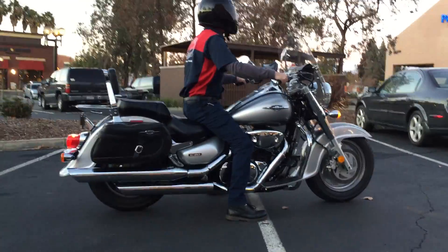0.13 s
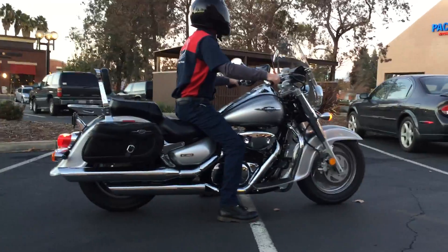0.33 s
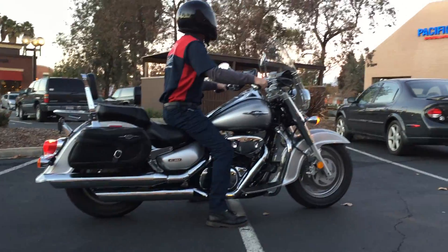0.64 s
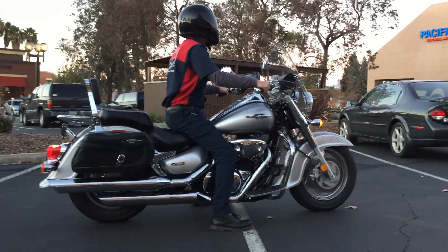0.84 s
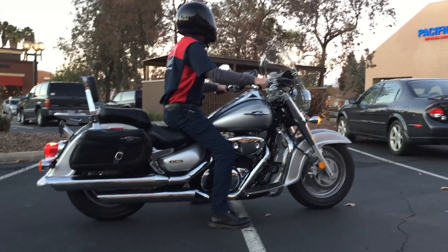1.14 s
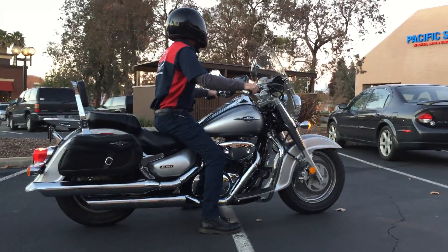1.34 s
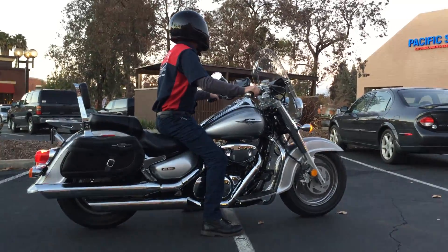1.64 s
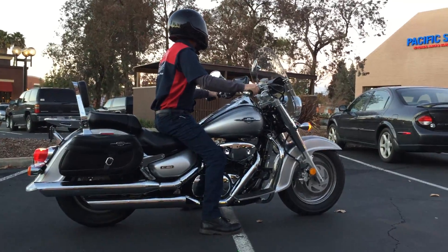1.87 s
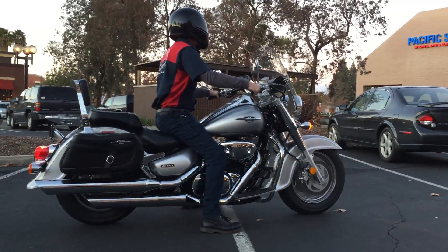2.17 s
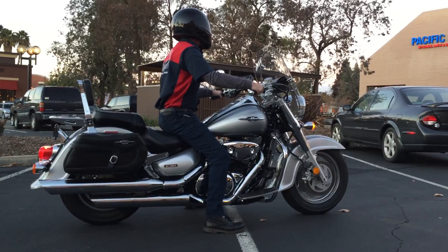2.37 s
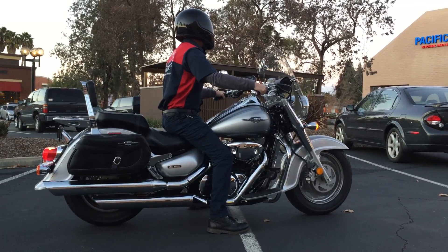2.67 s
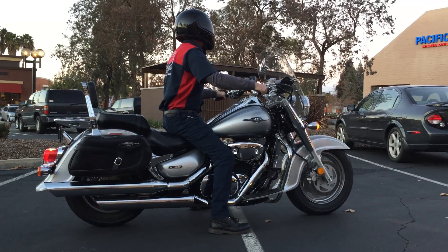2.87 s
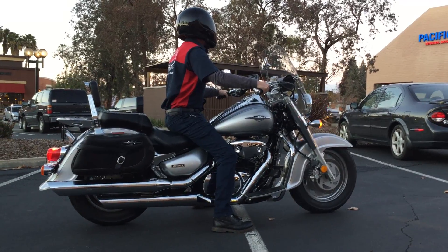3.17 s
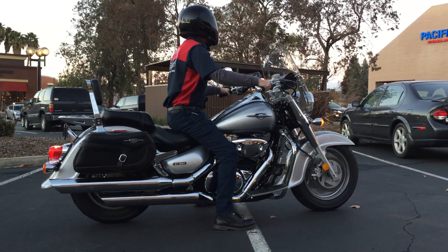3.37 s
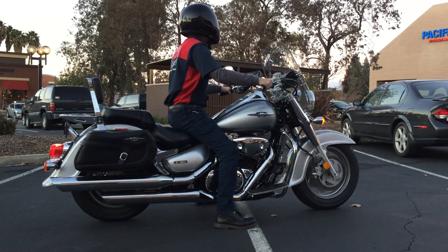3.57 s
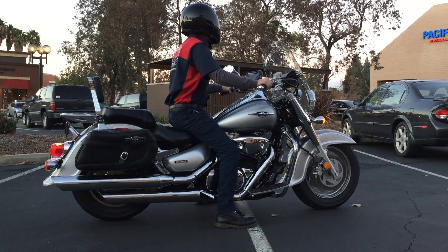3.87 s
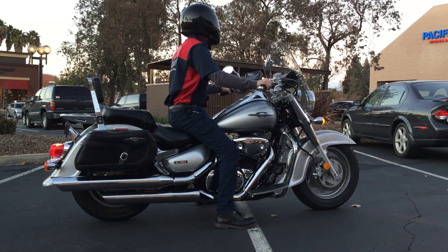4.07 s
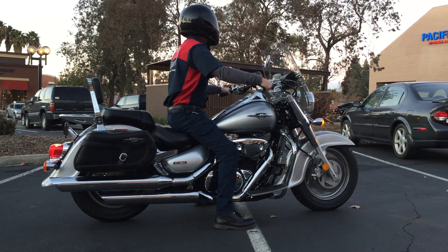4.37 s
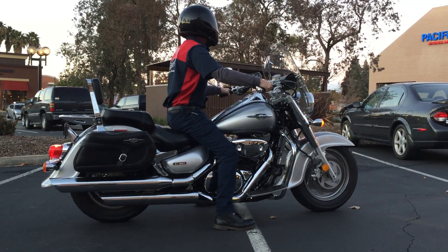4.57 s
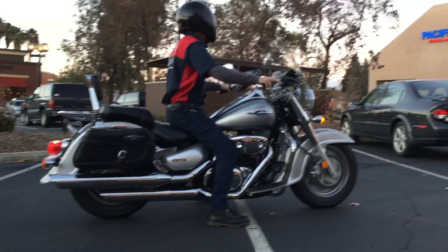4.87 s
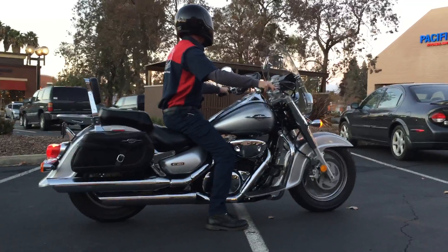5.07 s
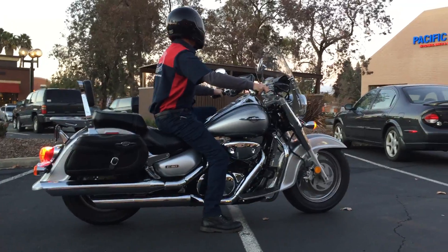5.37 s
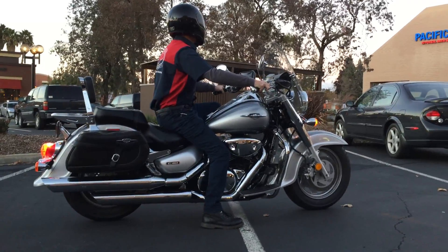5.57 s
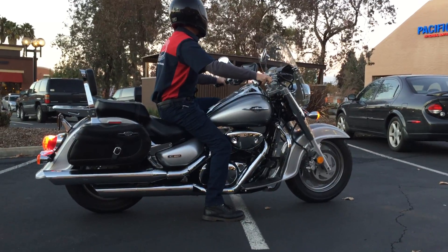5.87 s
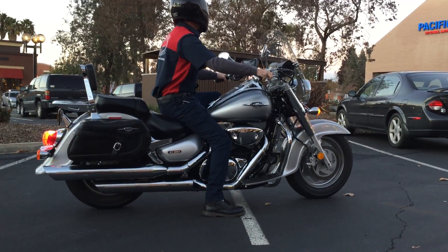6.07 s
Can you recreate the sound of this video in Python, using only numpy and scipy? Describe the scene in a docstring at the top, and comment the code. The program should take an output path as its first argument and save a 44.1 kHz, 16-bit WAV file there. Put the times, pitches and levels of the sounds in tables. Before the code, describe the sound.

Steady, bass-heavy motorcycle idle, the two cylinders firing in an unevenly spaced, galloping beat with mechanical chatter on top. Two short revs surge up, growling and rasping, then coast down through a humming pipe drone, uneven firings and small bright ticks. The second rev is slightly higher and starts with a couple of knocks. Mono, fairly close outdoor pickup, faint reflections from nearby walls and cars.

```python
"""In a parking lot, a few metres from the microphone, a big V-twin motorcycle idles fast and is blipped twice.
Two unevenly spaced exhaust pulses a cycle ring the pipes; with the throttle open they bark, rasp and hiss,
and a growl of cycle-rate tones climbs with the speed. Coasting down, the pipes drone in falling tones.
Valve strokes ring the cases as clatter; just above idle the firings turn uneven, and sharp ticks sound.
Parked cars and shop fronts return a thin tail."""
import sys
import numpy as np
from scipy import signal
from scipy.fft import rfft, irfft, next_fast_len
from scipy.io import wavfile
from scipy.ndimage import uniform_filter1d

SR = 44100
rng = np.random.default_rng(int(sys.argv[2]) if len(sys.argv) > 2 else 0)


def digitize_waveform(pressure):
    """Quantize a signal to 16-bit integers and store it at the path in sys.argv[1].

    Rows of a 2-D input are taken as channels; values are limited to [-1, 1].
    """
    field = np.atleast_2d(pressure).T
    bounded = np.clip(field, -1, 1)
    quanta = np.round(bounded * 32767).astype(np.int16)
    wavfile.write(sys.argv[1], SR, quanta)


N = 273861
TIME = np.arange(N) / SR
SIZE = next_fast_len(N + SR)  # room for tails to ring out
FREQ = np.arange(SIZE // 2 + 1) * SR / SIZE + 1e-6  # Hz, kept above zero


def undb(db):
    """Decibels to gain."""
    return 10 ** (np.asarray(db) / 20)


def shape(x, response):
    """Pass a sound through a frequency response."""
    return irfft(rfft(x, SIZE) * response, SIZE)[:N]


def mode(hz, width):
    """Response of one resonance, gain 1 at its centre."""
    return 1j * FREQ * width / (hz ** 2 - FREQ ** 2 + 1j * FREQ * width)


def modes(table):
    """Sum of the resonances in a table of (frequency, width, level)."""
    return sum(undb(db) * mode(hz, width) for hz, width, db in table)


def colour(points):
    """Response through (frequency, level) points, joined on a log frequency scale."""
    hz, db = np.transpose(points)
    return undb(np.interp(np.log(FREQ), np.log(hz), db))


def low_cut(hz):
    """First-order high-pass: an open pipe end radiates little bass."""
    return 1j * FREQ / (1j * FREQ + hz)


def high_cut(hz):
    """Second-order low-pass: a valve takes time to open, so its pulse is round."""
    s = 1j * FREQ / hz
    return 1 / (1 + np.sqrt(2) * s + s ** 2)


def steady(x):
    """Hold the rms near 1 over a few cycles, keeping the beat within them."""
    size = SR // 7
    power = uniform_filter1d(uniform_filter1d(x ** 2, size), size // 2)
    return x / np.sqrt(power + 1e-12)


def clicks(times, sizes):
    """A click of the given size at each time."""
    places = np.clip(times * SR, 0, N - 1).astype(int)
    return np.bincount(places, sizes, N)


def bursts(hits, rise_s, fall_s):
    """Envelope that swells and dies after each click."""
    s = 2j * np.pi * FREQ
    return np.abs(shape(hits, 1 / ((1 + s * rise_s) * (1 + s * fall_s))))


def grit(spread_db):
    """Noise made of tiny impacts, its level redrawn every 32 samples."""
    grain_db = spread_db * np.repeat(rng.standard_normal(N // 32 + 1), 32)[:N]
    return rng.standard_normal(N) * undb(grain_db)


def moments(crank, place):
    """Times at which the engine passes a place in its cycle."""
    cycles = np.arange(int(crank[-1] - place) + 1) + place
    return np.interp(cycles, crank, TIME)


def parking_lot(x, wet_db=-15, t60_s=1.0):
    """Parked cars and shop fronts scatter a thin tail."""
    tail = rng.standard_normal(N) * undb(-60 * TIME / t60_s) * (TIME > .015)
    tail = tail / np.linalg.norm(tail)
    return x + undb(wet_db) * shape(x, rfft(tail, SIZE) * low_cut(hz=305))


# Sharp ticks: (time [s], peak level before the trim and the colouring [dB])
TICK_TIMES = [(2.4718, -27), (2.5244, -28.5), (2.602, -27), (2.6823, -34), (2.804, -37), (4.867, -31),
              (4.916, -29), (5.0219, -31.5), (5.074, -34), (5.1877, -32.5)]
# Colour of the escaping gas, which also tints the ticks: (frequency [Hz], level [dB])
GAS_COLOUR = [(600, -3), (1200, 1), (2400, 3), (3200, -2), (4300, 6.5), (5200, 0.5), (7000, 1), (9600, -2),
              (10400, -9.5), (11800, -4), (13500, -9.5), (15500, -6.5)]


def ticks(trim_db=-4, fall_s=0.013):
    """Bright metallic ticks while the engine slows: short bursts of gritty noise."""
    s, db = np.transpose(TICK_TIMES)
    # a click through the burst filter shrinks with fall time, so scale it back up
    envelope = bursts(clicks(s, undb(db + trim_db)), rise_s=.0005, fall_s=fall_s) * fall_s * SR
    return shape(envelope * grit(spread_db=6.5), colour(GAS_COLOUR) * low_cut(hz=2500) * high_cut(hz=8700))


# Valve gear strokes: (place in the cycle [0-1], level [dB])
VALVE_STROKES = [(.2, -17), (.42, 2), (.55, 2.5), (0.838, 8), (0.962, 3.5)]
# Knocks in the cases as the drive takes up: (time [s], level over the levelled strokes [dB])
DRIVE_KNOCKS = [(3.968, 15), (4.028, 11)]
# Broad body of the engine: (frequency [Hz], level [dB])
ENGINE_BODY = [(250, 10), (600, 0.5), (1100, -3), (1700, 3.5), (2100, -5.5), (2600, -18), (3300, -2),
               (3900, -6), (5000, -19.5), (6500, -14.5), (8500, -26.5), (15000, -59)]
# Modes of the cases and cooling fins: (frequency [Hz], width [Hz], relative level [dB])
CASE_MODES = [(1394, 28, -7), (1567, 25, -3.5), (1689, 24, -5), (1786.5, 21, -1), (1877, 25, 3),
              (2070, 51, -17.5), (2770, 13, -13), (3102, 80, -13), (3565, 43, -9), (3893, 76, -11.5),
              (5990, 5.6, -14)]


def valve_gear(crank, clatter_db, rattle_db=-1, ring_db=-3, chain=4.0, scatter_db=4.0, fall_s=0.0097):
    """Rockers and valves strike at fixed places and ring the cases; chains and gears rattle between."""
    strokes = 0
    for place, db in VALVE_STROKES:
        times = moments(crank, place)
        strokes = strokes + clicks(times, undb(db + scatter_db * rng.standard_normal(len(times))))
    s, db = np.transpose(DRIVE_KNOCKS)
    knocks = bursts(clicks(s, undb(db)), rise_s=0.00031, fall_s=fall_s) * fall_s * SR
    blows = steady(bursts(strokes, rise_s=0.00033, fall_s=fall_s)) + knocks
    rattle = steady(shape((chain + blows) * grit(spread_db=-0.5), colour(ENGINE_BODY) * low_cut(hz=147)))
    ring = steady(shape((1.0 + blows) * rng.standard_normal(N), modes(CASE_MODES) * low_cut(hz=890)))
    return rattle * undb(clatter_db + rattle_db) + ring * undb(clatter_db + ring_db)


RADIATES_HZ = 54  # the pipe ends radiate little below this


def tones(cycle, rate_hz, table):
    """Clean multiples of the cycle rate, at rms 1; the deepest hardly leave the pipe."""
    out = 0
    for multiple, db in table:
        radiated = 1 / (1 + (RADIATES_HZ / (multiple * rate_hz)) ** 6)
        out = out + undb(db) * radiated * np.sin(2 * np.pi * multiple * cycle)
    return steady(out)


# Tones of the shut-throttle drone: (multiple of the cycle rate, relative level [dB])
DRONE_TONES = [(3, 0), (4, -10.5), (5, -5.5), (6, -8), (8, -12.5), (9, -17.5)]


def drone(crank, rate_hz, coasting, drone_db, lag_cycles=0.288):
    """Coasting with the throttle shut, the engine pumps the pipes in a smooth falling tone."""
    return tones(crank - lag_cycles, rate_hz, DRONE_TONES) * coasting * undb(drone_db)


# Tones of the open-throttle growl: (multiple of the cycle rate, relative level [dB])
GROWL_TONES = [(2, 6), (5, 3), (6, -3), (7, -8.5), (8, -7.5), (11, -16)]


def growl(port, rate_hz, throttle, growl_db):
    """Under load the pressure waves run together into a tone that climbs with the engine."""
    return tones(port, rate_hz, GROWL_TONES) * throttle ** 0.72 * undb(growl_db)


# Upper modes of the mufflers: (frequency [Hz], width [Hz], relative level [dB])
MUFFLER_MODES = [(394, 38, 13.5), (466, 57, 5.5), (512, 91, 9.5), (720, 35, 4.5), (932, 30, 10),
                 (1090, 400, -6.5)]


def gas(pulses, rasp_db, crack_db, hiss_db, flow=0.2):
    """Each pulse cracks and pushes a turbulent puff through the mufflers, over a steady flow."""
    puffs = steady(bursts(pulses, rise_s=0.0028, fall_s=0.012))
    muffler = modes(MUFFLER_MODES) * low_cut(hz=269) ** 2
    rasp = steady(shape(puffs * grit(spread_db=-3.5), muffler))
    crack = steady(shape(pulses, muffler * low_cut(hz=398) * high_cut(hz=1140)))
    hiss = steady(shape((flow + puffs) * grit(spread_db=0.0), colour(GAS_COLOUR) * low_cut(hz=450) ** 2))
    return rasp * undb(rasp_db) + crack * undb(crack_db) + hiss * undb(hiss_db)


# Low modes of the exhaust: (frequency [Hz], width [Hz], relative level [dB], polarity [+1 or -1])
PIPE_MODES = [(65.9, 12.1, 2, 1), (98.9, 12.4, -2, -1), (114.4, 5.5, -8, 1), (152.4, 24, -7.5, -1),
              (174.8, 17, -15, 1), (207, 25, -22, -1), (266.8, 15.3, -16.5, 1)]
# Modes that hot, fast gas drives: (frequency [Hz], width [Hz], relative level [dB])
BARK_MODES = [(171.7, 38, 26.5), (210, 91, -14), (270, 26, 3)]


def exhaust(pulses, boom_db, bark_db):
    """The pulses ring the pipes: low modes boom, and higher, broader modes bark."""
    pipe = sum(sign * undb(db) * mode(hz, width) for hz, width, db, sign in PIPE_MODES)
    pipe = pipe * low_cut(hz=46.5) * low_cut(hz=27) * high_cut(hz=606)
    bark = modes(BARK_MODES) * low_cut(hz=84.4) ** 2 * high_cut(hz=318) ** 2
    return steady(shape(pulses, pipe)) * undb(boom_db) + steady(shape(pulses, bark)) * undb(bark_db)


# Where the two cylinders fire: one place in the cycle [0-1] each
CYLINDER_PLACES = (.28, .64)
PORT_LEAD_S = .0023  # each pulse comes this long before its place
SCATTER_DB, LEAN_SCATTER_DB = 1.06, 3  # scatter of the firings: always, and added when lean
# Single firings that fail or kick: (time [s], level change [dB])
ODD_FIRINGS = [(.285, -18.5), (2.855, 5), (3.056, -4.5), (5.248, 0)]


def firings(port, lean, second_db=1.8, jitter_s=0.00032):
    """Two exhaust pulses a cycle, one from each cylinder, never quite alike."""
    scatter_db = SCATTER_DB + LEAN_SCATTER_DB * lean
    pulses = 0
    for place, cylinder_db in zip(CYLINDER_PLACES, (0, second_db)):
        times = moments(port, place) - PORT_LEAD_S
        chance = rng.standard_normal((len(times), 2))  # columns: loudness, timing
        db = cylinder_db + np.interp(times, TIME, scatter_db) * chance[:, 0]
        for s, stumble_db in ODD_FIRINGS:
            db = db + stumble_db * (np.abs(times - s) < .012)
        pulses = pulses + clicks(times + jitter_s * chance[:, 1], undb(db))
    return pulses


# The idle wanders and creeps up as the engine warms: (time [s], four-stroke cycle rate [Hz])
IDLE_SPEED = [(0, 12.509), (.85, 13.214), (1.5, 12.975), (3.3, 13.9), (3.85, 13.734), (5.6, 13.736),
              (6.21, 14)]
# Twists of the throttle: (opening time [s], climb time [s], cycle rate gained [Hz], coast-down time [s])
THROTTLE_BLIPS = [(1.641, .399, 20.179, .465), (3.92, .367, 22.645, .539)]
COAST_SHAPE = 1.543  # above 1, the fall starts gently


def engine_speed():
    """Blips spin the flywheel up an S-curve; friction slows it to idle. Returns (idle, speed) in Hz."""
    s, hz = np.transpose(IDLE_SPEED)
    idle_hz = np.interp(TIME, s, hz)
    rate_hz = idle_hz
    for opens_s, climb_s, gained_hz, coast_s in THROTTLE_BLIPS:
        climb = np.sin(np.pi / 2 * np.clip((TIME - opens_s) / climb_s, 0, 1)) ** 2
        coasted_s = np.maximum(TIME - opens_s - climb_s, 0)
        coast = np.exp(-(coasted_s / coast_s) ** COAST_SHAPE)
        rate_hz = rate_hz + gained_hz * climb * coast
    return idle_hz, rate_hz


FULL_PULL_HZ_PER_S = 97  # speed gain that counts as full throttle
# just above idle, with the throttle shut, the engine runs lean: weaker and more uneven
LEAN_HZ, LEAN_WIDTH_HZ, LEAN_BOOM_DB = 17.33, 1.83, -2.5
# above this speed a shut throttle makes the pipes drone, and the separate thumps weaken
DRONE_FROM_HZ, DRONE_FADE_HZ, DRONE_BOOM_DB = 18.7, 4.2, -2
# Loudness of each layer, before growl and drone are gated by the throttle: (level at idle [dB],
# rise at twice idle speed [dB], power of the octaves above idle, rise at full throttle [dB])
LAYER_LEVELS = {"boom": (-21, 1.5, 0.5, 0.5), "bark": (-43, 12, 1.14, 14.5), "growl": (-17.5, 2.5, 1, 0.5),
                "drone": (-18, 0.5, 0.5, 0), "rasp": (-47.5, 7.5, 1.5, 15.5),
                "crack": (-61.5, 6.5, 1.6, 22), "hiss": (-54.5, 17, 0.85, 11),
                "clatter": (-37.5, 7, 1.48, 8)}


def scene(lead_cycles=0.0517, throttle_bend=0.7, shut_below=.2):
    """The crank times the engine's sources; its speed and the throttle set how loud each is."""
    idle_hz, rate_hz = engine_speed()
    crank = np.cumsum(rate_hz) / SR  # cycles turned
    octaves = np.log2(rate_hz / idle_hz)
    # the harder the flywheel accelerates, the wider the throttle is open
    pull = np.clip(np.gradient(rate_hz - idle_hz) * SR / FULL_PULL_HZ_PER_S, 0, 1)
    throttle = np.abs(uniform_filter1d(pull ** throttle_bend, size=SR // 25))  # abs: no rounding below 0
    shut = np.clip(1 - throttle / shut_below, 0, 1)
    lean = shut * np.exp(-((rate_hz - LEAN_HZ) / LEAN_WIDTH_HZ) ** 2)
    coasting = shut * np.clip((rate_hz - DRONE_FROM_HZ) / DRONE_FADE_HZ, 0, 1)
    db = {layer: idle_db + speed_db * octaves ** power + open_db * throttle
          for layer, (idle_db, speed_db, power, open_db) in LAYER_LEVELS.items()}
    # under load the gas bursts out of the ports earlier in the cycle
    port = crank + lead_cycles * pull
    pulses = firings(port, lean)
    boom_db = db["boom"] + LEAN_BOOM_DB * lean + DRONE_BOOM_DB * coasting
    engine = valve_gear(crank, db["clatter"]) + ticks()
    pipes = drone(crank, rate_hz, coasting, db["drone"]) + growl(port, rate_hz, throttle, db["growl"])
    pipes = pipes + gas(pulses, db["rasp"], db["crack"], db["hiss"])
    pipes = pipes + exhaust(pulses, boom_db, db["bark"])
    return parking_lot(engine + pipes)[None]  # one microphone, one channel


TOP_HZ = 15500


def record(dry):
    """The phone rounds the highest peaks and cuts the top."""
    rounded = np.tanh(0.85 * dry) / 0.73
    top_cut = signal.ellip(10, .2, 80, TOP_HZ, fs=SR, output="sos")
    return signal.sosfilt(top_cut, rounded)


dry = scene()
out = record(dry)
digitize_waveform(out)
```